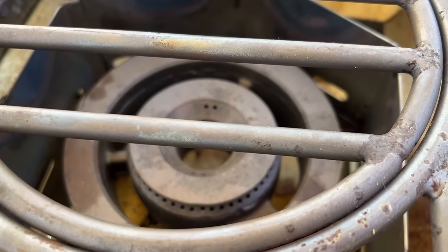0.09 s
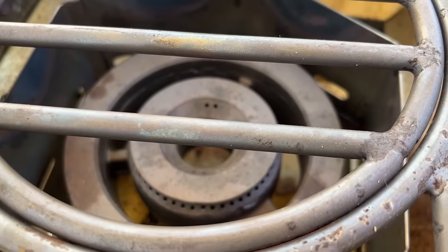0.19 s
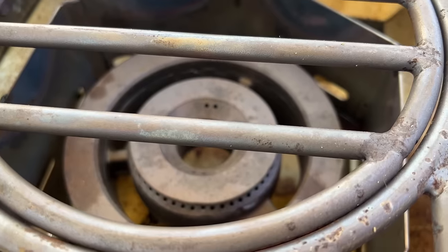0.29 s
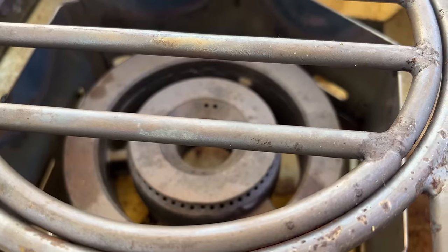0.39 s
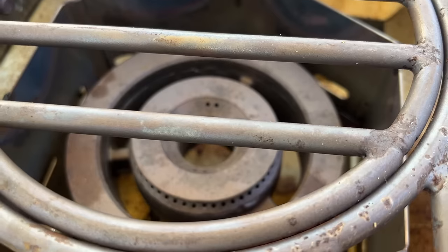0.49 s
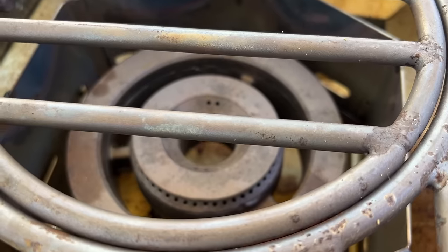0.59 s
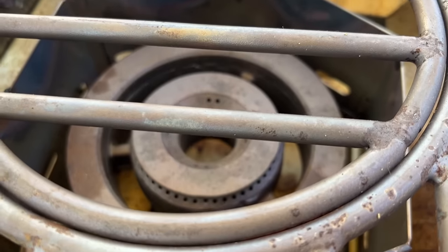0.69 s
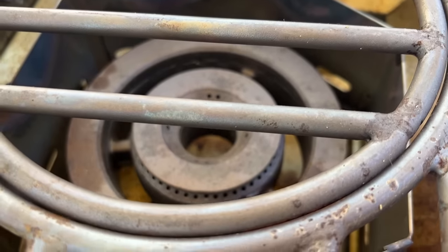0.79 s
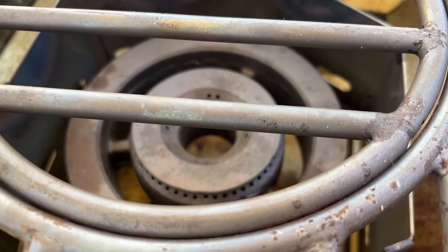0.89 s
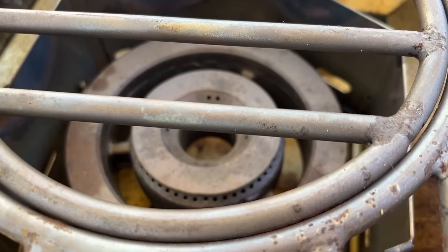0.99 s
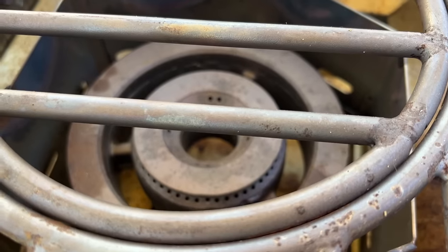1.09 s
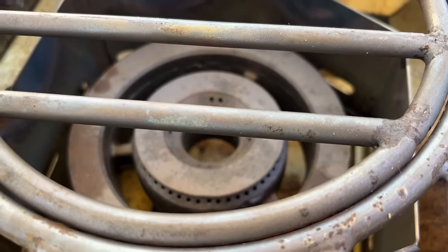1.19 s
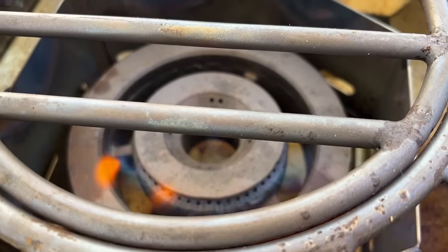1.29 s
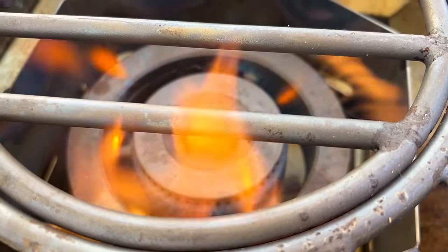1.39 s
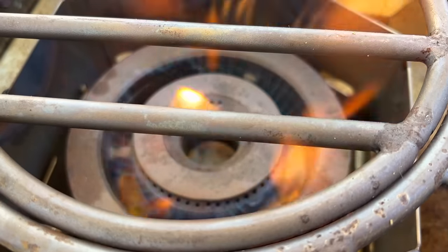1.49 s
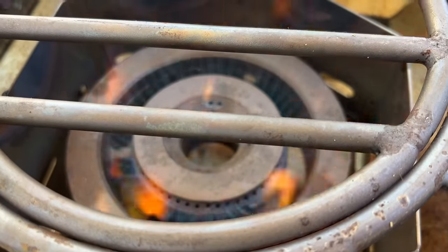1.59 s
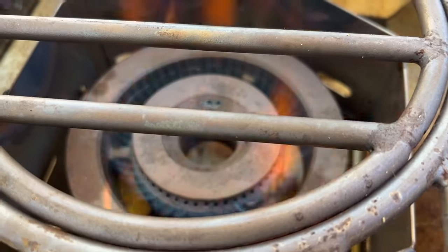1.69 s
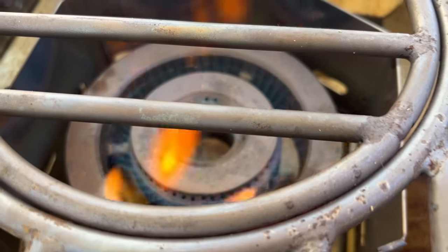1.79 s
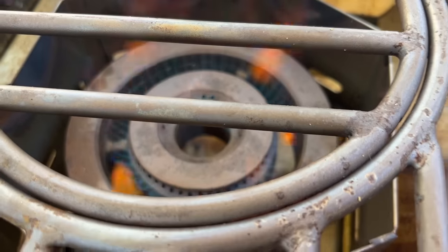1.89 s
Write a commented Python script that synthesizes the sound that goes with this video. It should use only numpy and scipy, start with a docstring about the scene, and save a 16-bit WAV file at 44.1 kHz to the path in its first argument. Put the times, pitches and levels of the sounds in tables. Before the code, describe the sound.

A gas grill burner being lit, heard close up in stereo outdoors: knob knocks rattle the sheet metal, gas hisses, the igniter snaps, two low puffs of flame follow, then a soft fluttering roar.

```python
"""A gas grill burner is lit, close by and outdoors: gas catches in low puffs, two bursts of them strong
and a few faint, with gliding notes, and the flame settles to a fluttering roar of shaped noise.
Before that the valve knob knocks in the sheet-metal housing and the igniter snaps,
both made of short noise bursts and dying tones. Gas hiss and outdoor air are noise that sways in level."""
import sys
import numpy as np
from scipy import signal
from scipy.fft import rfft, irfft, next_fast_len
from scipy.io import wavfile
from scipy.ndimage import map_coordinates

SR = 44100
rng = np.random.default_rng(int(sys.argv[2]) if len(sys.argv) > 2 else 0)


def wav_out(sig):
    """Save sig, one row per channel (or a flat mono array), as 16-bit PCM at SR to the path in sys.argv[1]."""
    wavfile.write(sys.argv[1], SR, np.round(np.clip(np.atleast_2d(sig).T, -1, 1) * 32767).astype(np.int16))


N = 83790  # samples, 1.9 s


def amp(db):
    """Turn decibels into a gain."""
    return 10 ** (np.asarray(db) / 20)


def unit(x):
    """Scale a sound to an rms of 1."""
    return x / np.sqrt(np.mean(x ** 2) + 1e-20)


def along(points, hz):
    """Read a curve of (f/Hz, value) points, joined by straight lines on a log frequency axis."""
    f, values = np.transpose(points)
    return np.interp(np.log(hz + 1), np.log(f + 1), values)


def curves(rows):
    """Draw each column after the time as a curve with one value per sample."""
    times, *columns = np.transpose(rows)
    return [np.interp(np.arange(N) / SR, times, column) for column in columns]


def since(s):
    """Count the seconds since a moment, zero before it."""
    return np.maximum(np.arange(N) / SR - s, 0)


def wobble(rate):
    """Draw a smooth random curve through a number of random points per second."""
    return map_coordinates(rng.standard_normal(2048), [np.arange(N) * rate / SR], mode="wrap")


def filtered(x, response):
    """Shape a sound by a response that depends on frequency."""
    size = next_fast_len(N + SR // 4)  # spare room keeps the end from wrapping onto the start
    shaped = rfft(x, size) * response(np.fft.rfftfreq(size, 1 / SR))
    return irfft(shaped, size)[..., :N]


def spread(hz):
    """Give the angle that sets how far left and right differ: wider where they are less alike."""
    # likeness of left and right: f/Hz, likeness (1 = the same)
    alike = [(100, .998), (300, .98), (750, .88), (1250, .3), (1950, .5), (3500, .1), (8000, .2),
             (14000, .2)]
    return np.arccos(np.clip(along(alike, hz), -1, 1)) / 2


def noise(spectrum):
    """Make stereo noise of rms 1 from a part both sides share and a part they have with opposite sign."""
    def color(hz):
        return amp(along(spectrum, hz)) * [np.cos(spread(hz)), np.sin(spread(hz))]

    shared, opposed = filtered(rng.standard_normal((2, N)), color)
    return unit(np.array([shared + opposed, shared - opposed]))


def fade(t, attack, hold, t60):
    """Rise with a time constant, hold, then die away by 60 dB in every t60 seconds."""
    return (1 - np.exp(-t / attack)) * amp(-60 * np.maximum(t - hold, 0) / t60)


def ring(modes, t, attack):
    """Ring metal as dying tones that waver in pitch and level and reach each side with another phase."""
    waver_hz, waver_depth = 45, .42  # random points per second; radians of phase and share of level
    scatter_db = 1  # random change of each tone's level from blow to blow
    out = np.zeros((2, N))
    live = (t > 0) & (t < 1)
    u = t[live]
    for hz, db, t60 in modes:
        side_phase = rng.choice([-1, 1]) * spread(hz) * np.array([[1], [-1]])
        phase = rng.uniform(0, 2 * np.pi) + side_phase
        drift, swell = waver_depth * np.array(
            [np.interp(u * waver_hz, np.arange(128), rng.standard_normal(128)) for _ in range(2)])
        size = amp(db + scatter_db * rng.standard_normal()) * (1 + swell)
        out[:, live] += size * fade(u, attack, 0, t60) * np.sin(2 * np.pi * hz * u + phase + drift)
    return out


def air():
    """Fill the outdoors with soft noise whose level sways slowly."""
    # colour of the outdoor background: f/Hz, relative level per Hz/dB
    outdoors = [(20, -28), (50, -1.5), (110, -5), (180, 4.5), (280, -2), (500, -3.5), (800, -5),
                (1200, -5.5), (2000, -6), (2700, -9), (4000, -13.5), (8000, -22), (12000, -31),
                (16000, -40)]
    return amp(-46 + 0.93 * wobble(7.47)) * noise(outdoors)


def walls(x, count=8):
    """Bounce quick copies of the treble off the steel walls, at different delays on each side."""
    echo_db, longest_s, above_hz = -8, .009, 820
    delays = rng.uniform(0.000485, longest_s, (count, 2, 1))
    signs = rng.choice([-1, 1], (count, 2, 1))

    def echoes(hz):
        copies = np.sum(signs * np.exp(-2j * np.pi * hz * delays), axis=0) / np.sqrt(count)
        return copies * hz ** 2 / (hz ** 2 + above_hz ** 2)

    return amp(echo_db) * filtered(x, echoes)


def gas():
    """Hiss like gas through a jet: coloured noise whose level follows a set curve and sways at random."""
    # strength of the hiss before the sway: t/s, level/dB
    hiss_level = [(0, -53), (.72, -58), (.9, -55), (1.13, -47), (1.38, -60), (1.5, -50), (1.9, -49.5)]
    # colour of the jet: f/Hz, relative level per Hz/dB
    jet = [(100, -48), (500, 4), (750, 9), (1100, -13.5), (2200, -1.5), (3600, -16), (4300, -8), (5100, -5),
           (6200, -13), (7200, -10), (7650, -3.5), (8100, -10.5), (12000, -14.5), (16000, -25)]
    level_db, = curves(hiss_level)
    return amp(level_db + 1.6 * wobble(24)) * noise(jet)


def knob():
    """Knock with a tick, a dead clack, a rattle of the panels, a low boom and the housing's ring."""
    # knocks of the knob: t/s, level/dB, treble cut of all but the tick/Hz, housing ring/dB,
    # clack/dB, clack pitch/Hz, metal tick/dB (parts are relative to the knock's level)
    knocks = [(.008, -44, 1110, 4, 6, 793, -51), (.175, -27, 1950, 0, 6, 906, -20),
              (0.237, -36.5, 1160, 7, -6, 900, -36), (0.278, -31, 775, 3.5, 4, 337, -14),
              (0.37, -10, 4130, -3.5, 4, 793, -14.5), (.375, -24, 2240, -15, 8.5, 547, -19),
              (.385, -15, 2320, -28, 3, 846, -26), (.542, -21.5, 970, -0.5, -1, 744, -20.5),
              (0.569, -37, 460, 7, 12, 360, -38), (0.642, -34, 470, 4.5, -2, 303, -5)]
    # tones of the housing: f/Hz, relative level/dB, time to die by 60 dB/s
    housing = [(171.6, -22, 1), (221.7, -11, .25), (290.2, -16, 0.51), (322.3, -11.5, 0.37),
               (369.5, -11, 0.52), (436, -25, 0.39), (553.7, -14, 0.49), (765, -17, 0.26),
               (837.8, -3, 0.14), (937, -5, 0.23), (1170, -19.5, 0.4), (1366, 0.5, 0.063),
               (1680, -11, 0.18), (1897, -3.5, 0.15)]
    # colours of the panels' dense rattle, the slow sway of the grill's body and the tick:
    # f/Hz, relative level per Hz/dB
    panels = [(30, -36), (90, -50), (200, -8.5), (450, -6.5), (800, -1.5), (1080, -9), (1500, -12.5),
              (1950, -9), (2300, -17.5), (3400, -22), (4200, -35), (8000, -40), (16000, -20)]
    body = [(25, -29), (50, -6), (85, 0), (130, -5), (220, -5.5), (500, -45)]
    tick_color = [(500, -15), (1300, 2.5), (3200, 3.5), (5000, -5.5), (8000, -11.5), (12000, -14.5),
                  (16000, -25)]
    clack_cycles = 2.2  # the clack is loudest after this many cycles
    out = np.zeros((2, N))
    for s, db, dull_hz, ring_db, clack_db, clack_hz, tick_db in knocks:
        t = since(s)
        rise = t * clack_hz / clack_cycles
        clack_shape = rise ** 2 * np.exp(2 - 2 * rise)
        clack = amp(clack_db) * clack_shape * np.sin(2 * np.pi * clack_hz * t)
        short = amp(-2.5) * fade(t, attack=0.00097, hold=0.008, t60=0.076)
        tail = amp(-21.5) * fade(t, attack=0.015, hold=0, t60=0.8)
        rattle = noise(panels) * (short + tail)
        boom = amp(-34.5) * noise(body) * fade(t, attack=.01, hold=0, t60=1.5)
        knock = clack + rattle + boom + amp(ring_db) * ring(housing, t, attack=.0055)
        dull = signal.butter(4, min(dull_hz, SR / 3), fs=SR, output="sos")
        tick = amp(tick_db) * noise(tick_color) * fade(t, attack=0.00035, hold=0.0022, t60=0.096)
        out += amp(db) * (tick + signal.sosfilt(dull, knock))
    return out


def igniter():
    """Snap a sprung hammer: a crack, a buzz and a spring's ring, with the burner head and grate set going."""
    # snaps: t/s, level/dB, burner head and grate relative to that/dB
    snaps = [(0.137, -52, 3), (0.2208, -20, -19), (1.162, -16, 2.5)]
    # colours of the snap and the grate: f/Hz, relative level per Hz/dB
    snap_color = [(100, -25), (1500, -21), (3000, -10.5), (5000, -6), (8000, 1), (12000, -3), (15500, -5),
                  (17000, -32)]
    grate_color = [(60, -50), (200, -13.5), (450, -15), (1000, -2.5), (1700, -10.5), (2600, -9),
                   (4000, -14), (9000, -27), (16000, -31)]
    # tones of the burner head and of the spring: f/Hz, relative level/dB, time to die by 60 dB/s
    burner = [(870, -32, 0.32), (1146, -4.5, 0.15), (1440, -31, 0.063), (1597, 0, 0.11), (1650, -12, 0.35),
              (1958, -2.5, 0.12), (2270, -18, 0.25), (2460, -18, .2), (3085, -5, 0.11), (4330, -27, .11)]
    spring_modes = [(7150, -14, 0.11), (8080, -24, 0.11), (8415, -22, 0.082), (12604, -16.5, 0.11),
                    (14672, -21, .075)]
    slip_s, slip_db = 0.011, -5
    grit_db, chatter_db = 1, 3  # random unevenness of the buzz and of the grate
    out = np.zeros((2, N))
    for s, db, ring_db in snaps:
        t = since(s)
        crack = amp(1) * fade(t, attack=0.000074, hold=0, t60=0.0087)
        burst = fade(t, attack=0.0007, hold=0.0027, t60=0.053)
        tail = amp(-16) * fade(t, attack=0.0034, hold=0, t60=.18)
        buzz = amp(grit_db * wobble(900) - 2.5) * (burst + tail)
        spring = ring(spring_modes, t, attack=.0005)
        # the hammer scrapes ever harder just before it strikes
        slip = amp(slip_db) * since(s - slip_s) / slip_s * (t == 0)
        chatter = amp(chatter_db * wobble(450))
        strike = fade(t, attack=0.00062, hold=0.018, t60=0.15)
        grate = amp(-4) * noise(grate_color) * chatter * (slip + strike)
        head = amp(1) * ring(burner, t, attack=0.0055)
        out += amp(db) * ((crack + buzz) * noise(snap_color) + spring + amp(ring_db) * (grate + head))
    return out


def puffs():
    """Catch pockets of gas with a rush of air and a note that falls as the ball of flame grows."""
    # puffs: t/s, level/dB, length/s, first pitch/Hz, last pitch/Hz, rush of air relative to the level/dB
    catches = [(1.202, -13, 0.033, 269, 251, -4), (1.208, -14.5, 0.047, 135.4, 41.7, -8),
               (1.321, -11.5, .014, 321, 179, -13), (1.327, -11.5, 0.012, 139, 50.3, -16.5),
               (1.506, -27, 0.017, 304, 215, -7.5), (1.75, -27, 0.015, 378, 235, -1),
               (1.821, -22, 0.011, 295, 210, -8)]
    # colour of the rush of air: f/Hz, relative level per Hz/dB
    rush = [(40, -30), (150, -10), (300, 10.5), (450, -20), (660, 5.5), (900, -20), (1400, -10),
            (2200, -17), (4000, -28.5), (16000, -51)]
    out = np.zeros((2, N))
    for s, db, length, first_hz, last_hz, rush_db in catches:
        u = np.minimum(since(s) / length, 1)  # progress from 0 to 1
        hz = first_hz * (last_hz / first_hz) ** u
        note = np.sin(2 * np.pi * np.cumsum(hz * (u > 0)) / SR)
        out += amp(db) * np.sin(np.pi * u) * (note + amp(rush_db) * noise(rush))
    return out


def flame():
    """Roar with turbulent burning in the burner bowl, which flutters at random, over a low rumble."""
    # strength of the flame: t/s, roar before flutter/dB, rumble/dB
    strength = [(1.15, -82, -90), (1.185, -24, -58), (1.213, -27.5, -25), (1.235, -26, -17),
                (1.262, -27.5, -29.5), (1.305, -25.5, -34), (1.33, -26, -40), (1.36, -30, -28),
                (1.405, -33, -43), (1.49, -29, -35), (1.62, -31.5, -41.5), (1.70, -33, -48),
                (1.78, -32.5, -41.5), (1.9, -31.5, -39)]
    # colours of the roar and the rumble: f/Hz, relative level per Hz/dB
    roar_color = [(40, -28), (110, -16.5), (180, -8), (295, 0), (360, -17.5), (420, -7), (480, -11.5),
                  (680, -9.5), (960, -24), (1100, -22.5), (1500, -23), (1760, -27.5), (1960, -19.5),
                  (2300, -29.5), (3200, -37), (6000, -43), (16000, -70)]
    rumble_color = [(20, -32), (40, -4), (60, 2.5), (120, 4), (200, 2.5), (500, -46)]
    roar_db, rumble_db = curves(strength)
    flutter_db = 1.16 * wobble(70) + 0.54 * wobble(26)
    roar = amp(roar_db + flutter_db) * noise(roar_color)
    rumble = amp(rumble_db) * noise(rumble_color)
    return roar + rumble


def scene():
    """Add the grill and its reflections to the outdoor background."""
    grill = knob() + igniter() + puffs() + flame() + gas()
    return grill + walls(grill) + air()


def record(dry):
    """Hear it through two microphone ports, with a low cut, a treble notch, a full-scale limit and a top cut."""
    # left over right: f/Hz, level/dB
    balance = [(100, 1.26), (600, 2.6), (2000, 0.17), (5000, 2.1), (10000, 0.32)]
    # lead of the left side over the right: f/Hz, phase/radians
    lead = [(50, .08), (250, .27), (750, .55), (1600, -.1), (3500, .4), (7000, -.6), (13000, .2)]
    notch_hz, notch_width_hz, notch_db = 10157, 830, -23.5
    low_cut_hz, top_hz = 34, 16100
    sides = np.array([[1], [-1]]) / 2  # each side takes half of every difference

    def microphone(hz):
        ports = amp(sides * along(balance, hz)) * np.exp(1j * sides * along(lead, hz))
        notch = amp(notch_db * np.exp(-np.abs((hz - notch_hz) / notch_width_hz) ** 3))
        low_cut = hz ** 4 / (hz ** 4 + low_cut_hz ** 4)
        return ports * notch * low_cut

    heard = np.clip(filtered(dry, microphone), -1, 1)
    return filtered(heard, lambda hz: 1 / (1 + (hz / top_hz) ** 120))


dry = scene()
out = record(dry)
wav_out(out)
```